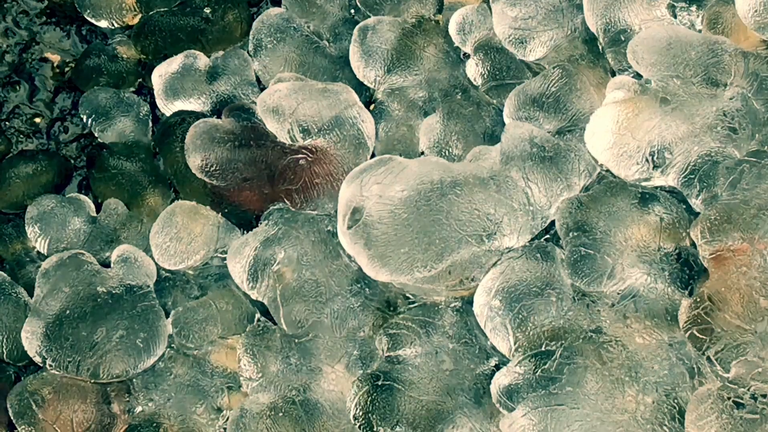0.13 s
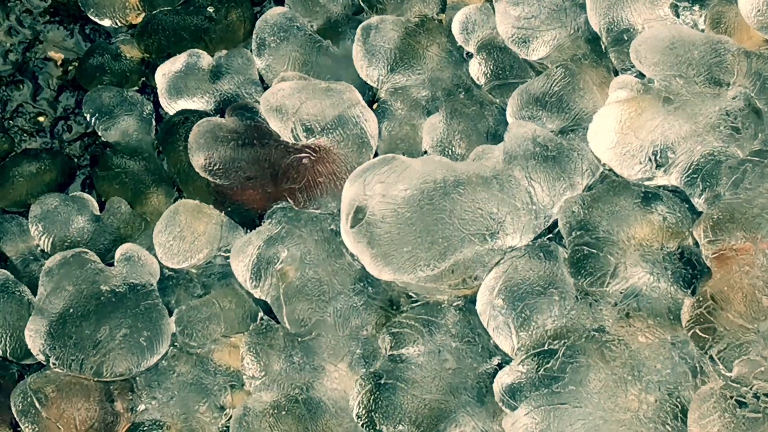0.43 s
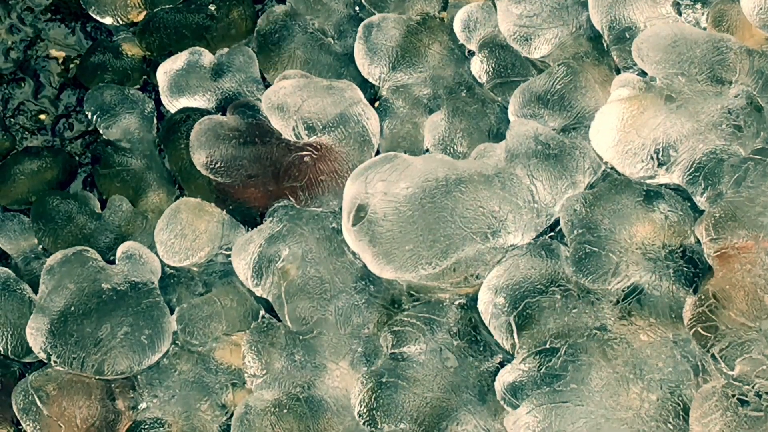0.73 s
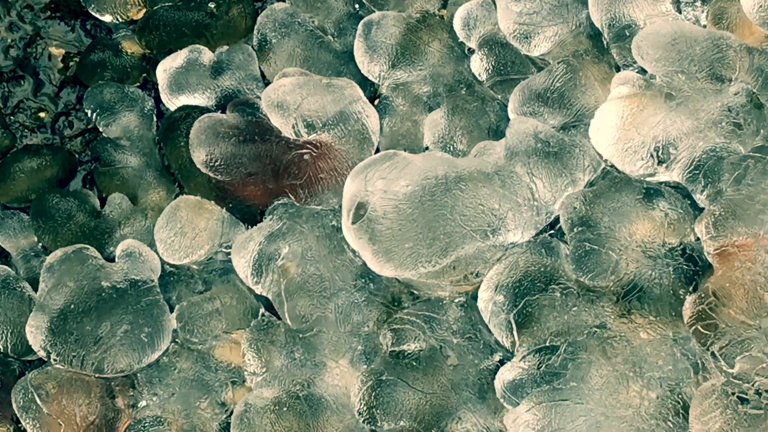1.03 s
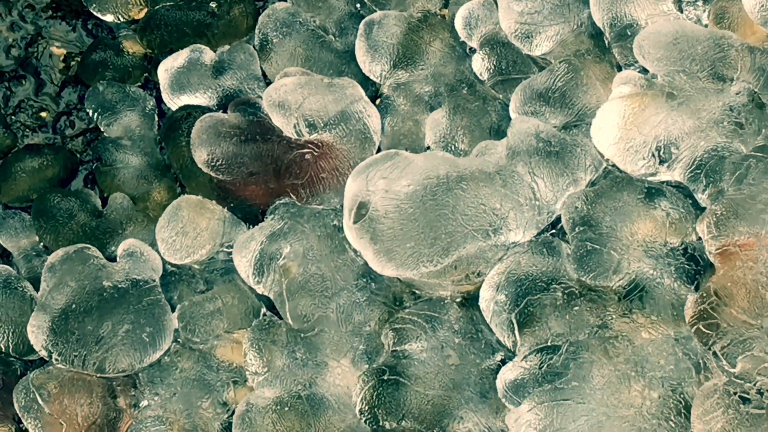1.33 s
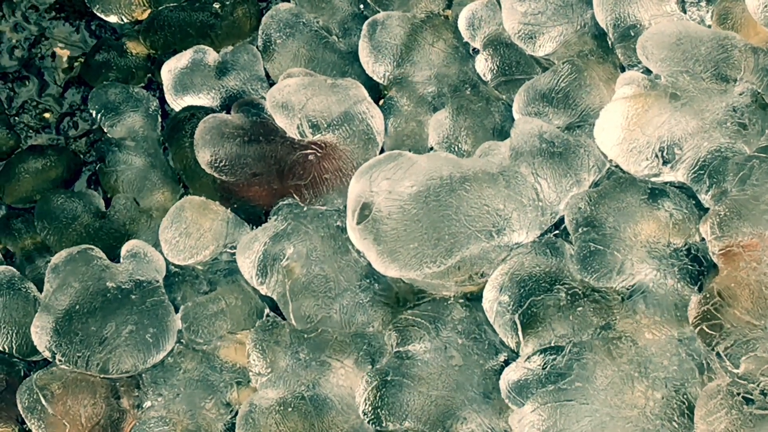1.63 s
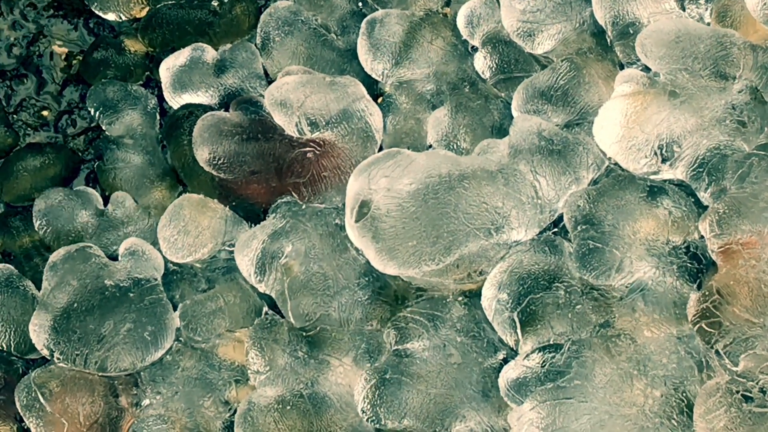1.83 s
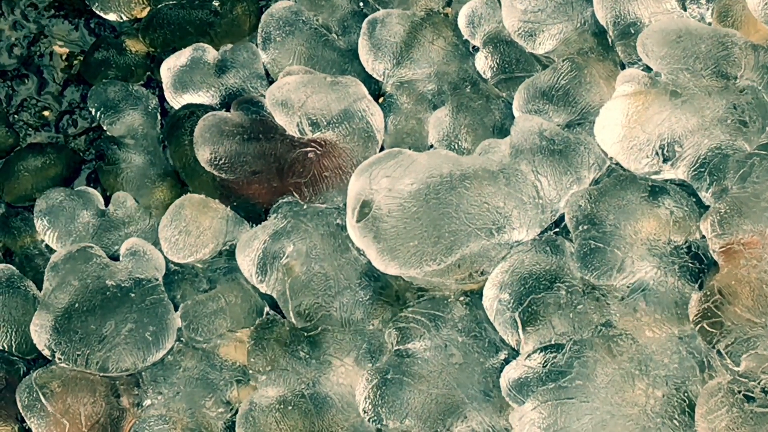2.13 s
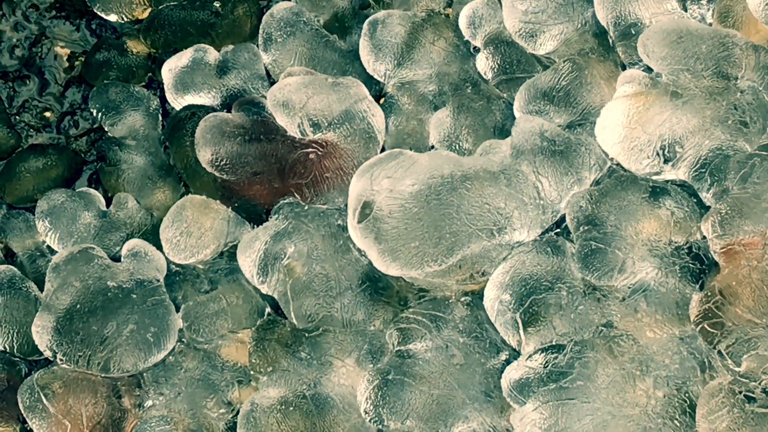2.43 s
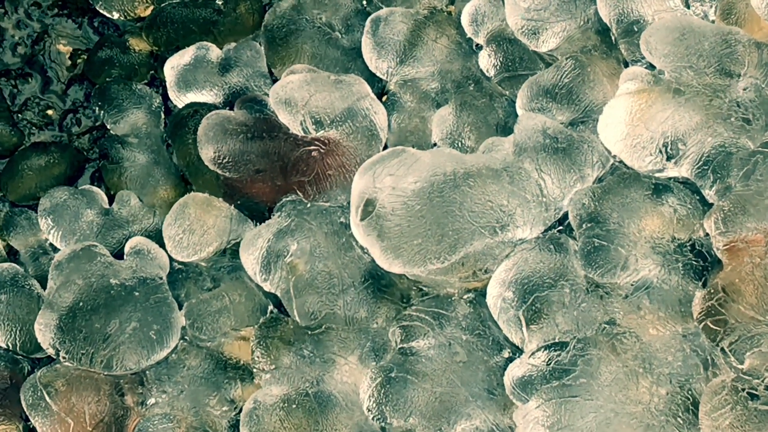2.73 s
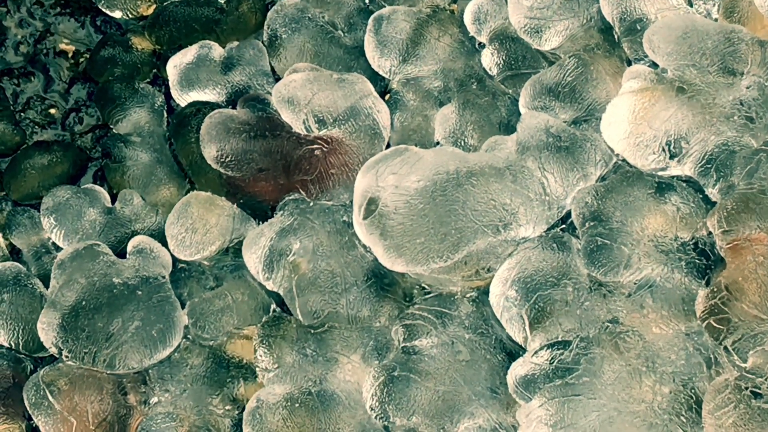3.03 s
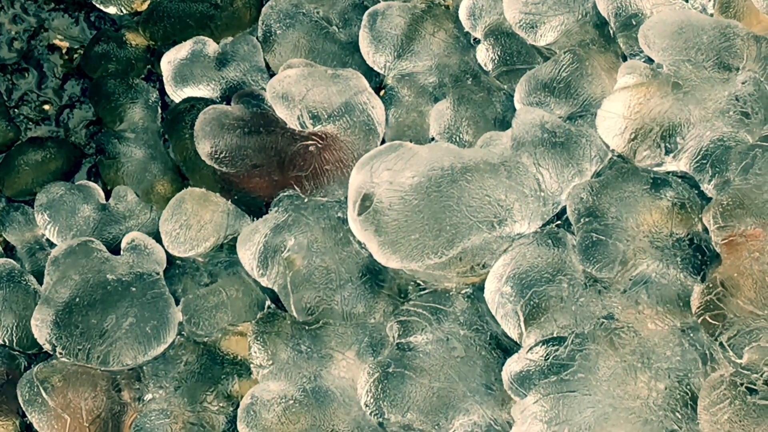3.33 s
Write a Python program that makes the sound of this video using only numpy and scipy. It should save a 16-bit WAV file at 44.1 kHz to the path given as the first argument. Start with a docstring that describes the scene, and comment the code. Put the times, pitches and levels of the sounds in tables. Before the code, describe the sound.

Creek water rushes steadily over stones and ice for about 3.5 seconds, fading in within the first 0.1 second. Dense bright spray, fizzing splashes and small bubbles form an even wash, close and mono. Sharp drops tick irregularly, with brief gurgles among them. Deeper bubbling swells around 1.9-2.9 seconds. Beneath, a soft low rumble continues; a faint engine-like hum emerges near 2, rises wavering, and peaks around 2.9.

```python
"""A creek rushes steadily over stones beside lumps of ice, close to a single microphone.
Filtered noise makes a wash of far water; random clicks set off dense drops, splashes and small bubbles.
A few near drops tick and larger bubbles gurgle, made from short rings and puffs of noise.
Underneath lie a low rumble of filtered noise and a faint hum, a gliding sine like a far engine
gathering speed. The sound fades in at the start."""
import sys
import numpy as np
from scipy import signal
from scipy.fft import rfft, irfft
from scipy.io import wavfile

SR = 44100
rng = np.random.default_rng(int(sys.argv[2]) if len(sys.argv) > 2 else 0)


def persist_wave(psi):
    """Save psi, clipped to +-1, as 16-bit WAV."""
    counts = np.round(np.clip(psi, -1, 1) * 32767).astype(np.int16)
    wavfile.write(sys.argv[1], SR, np.atleast_2d(counts).T)


N = 154350  # samples: 3.5 seconds

# Colour of the water: how strong each pitch range is. Each row: frequency in Hz, relative level in dB per Hz.
WATER_COLOUR = [(30, 0), (130, 1.5), (180, -3.5), (215, -3), (242, 2), (290, -7), (350, 1.5), (435, -6),
                (505, 1), (565, -6), (635, 0), (690, -4), (830, 2), (900, -0.5), (980, 2.5), (1080, -1.1),
                (1600, 0), (2000, -1.96), (2600, 1.3), (3300, 3), (3800, 0), (4550, 3), (4950, -1),
                (5500, 1.5), (6300, 3), (7100, 0), (7650, -2), (8600, 1), (9800, -0.9), (10400, -4),
                (11300, -0.05), (13000, -0.8), (14500, -0.5), (15800, -7)]


def amp(db):
    """Turns decibels into a gain."""
    return 10 ** (np.asarray(db) / 20)


def unit(x):
    """Scales a signal to an rms (average strength) of 1."""
    return x / np.sqrt(np.mean(x ** 2) + 1e-20)


def read_spectrum(points, hz):
    """Reads levels in dB between the points of a spectrum, on a log-frequency axis."""
    point_hz, level_db = np.transpose(points)
    return np.interp(np.log(hz + 1), np.log(point_hz + 1), level_db)


def add(mix, start_s, sound):
    """Mixes a sound in at a time, cutting it off where the mix ends."""
    part = mix[max(round(start_s * SR), 0):][:len(sound)]
    part += sound[:len(part)]


def drift(shape, *lengths):
    """Random field of rms 1, smooth over the given number of steps along each axis."""
    field = rng.standard_normal(shape)
    for axis, length in enumerate(lengths):
        field = np.swapaxes(field, axis, -1)
        n = field.shape[-1]
        smoothing = np.exp(-(2 * np.fft.rfftfreq(n) * length) ** 2)
        field = np.swapaxes(irfft(rfft(field) * smoothing, n), axis, -1)
    return unit(field)


def coloured(x, points, size=4096):
    """Gives a sound a spectrum with a filter that only looks back in time; result has rms 1."""
    level_db = read_spectrum(points, abs(np.fft.fftfreq(size, 1 / SR)))
    log_gain = np.log(amp(level_db))
    # The Hilbert transform finds the phase that puts the filter's energy as early as possible.
    taps = np.fft.ifft(np.exp(np.conj(signal.hilbert(log_gain)))).real
    return unit(signal.oaconvolve(x, taps[:size // 2])[:N])


def impacts(per_s, spread_db, cap):
    """Random clicks, most small and a few large; the largest stand cap * spread_db above the smallest."""
    happens = rng.random(N) < per_s / SR
    size_db = spread_db * np.minimum(rng.exponential(1, N), cap)
    return happens * amp(size_db) * rng.choice([-1, 1], N)


def bubble(hz, cycles):
    """A ringing air pocket that fades in the given number of cycles, its pitch rising as it dies."""
    rise = 0.024  # share of the pitch gained per fade time
    age = np.arange(0, 6, hz / cycles / SR)  # in fade times
    ring = np.sin(2 * np.pi * cycles * age * (1 + rise * age / 2))
    soft_start = 1 - np.exp(-2 * age * cycles)
    return ring * np.exp(-age) * soft_start


def banks(x, size=4096):
    """Adds short scattered echoes from stones and ice: a brief burst of noise-like reflections."""
    echo_db, echo_s = -7, 0.007
    t = np.arange(size) / SR
    echoes = rng.standard_normal(size) * np.exp(-t / echo_s) * (1 - np.exp(-t / echo_s))
    direct = t == 0
    return signal.oaconvolve(x, direct + amp(echo_db) * echoes / np.linalg.norm(echoes))


def wash(size=256):
    """Far water: so many splashes blur into noise, with drifting patches, a shared flicker and a slow swell."""
    wash_db, patch_db, flicker_db, swell_db = -35, 0.82, 0.7, 0.2
    hop = size // 4
    shape, rate = (N // hop + 8, size // 2 + 1), SR / hop  # (time frames, bands), frames per second
    noise = rng.standard_normal(shape) + 1j * rng.standard_normal(shape)
    patches = patch_db * drift(shape, 0.016 * rate, 1300 * size / SR)  # smooth over 16 ms and 1300 Hz
    flicker = flicker_db * drift(shape[0], 0.025 * rate)
    swell = swell_db * drift(shape[0], 0.13 * rate)
    level_db = patches + (flicker + swell)[:, None]
    water = signal.istft((noise * amp(level_db)).T, nperseg=size, noverlap=size - hop)[1][:N]
    return amp(wash_db) * coloured(water, WATER_COLOUR)


def spray(surge, count=24):
    """Fine drops: each impact is a click of about two cycles at most, spread over the treble."""
    spray_db, drops_per_s, spread_db, cap_db = -37.5, 2200, 4.5, 16
    out = np.zeros(N)
    for hz in np.linspace(1200, 15500, count):
        drop = banks(bubble(hz, hz * 0.00015))  # fades in 0.15 ms
        clicks = impacts(drops_per_s / count, spread_db, cap_db / spread_db)
        out += signal.oaconvolve(clicks, drop / np.linalg.norm(drop))[:N]
    return amp(spray_db) * coloured(out * surge, WATER_COLOUR)


def splashes(surge, count=20):
    """Small splashes: breaking water gives sudden puffs of fizzing noise, each in its own band."""
    splash_db, splashes_per_s, spread_db = -40, 290, 1
    fade_s, width_octaves = 0.0052, 0.66
    out, hz = np.zeros(N), np.fft.rfftfreq(N, 1 / SR)
    for centre_hz in np.geomspace(900, 14000, count):
        band = np.exp(-(np.log2((hz + 1) / centre_hz) / width_octaves) ** 2 / 2)
        fizz = irfft(rfft(rng.standard_normal(N)) * band, N)
        hits = impacts(splashes_per_s / count, spread_db, 2.3)
        # Each hit adds power that dies away; the square root turns power into loudness of the fizz.
        power = signal.lfilter([1], [1, -np.exp(-2 / (fade_s * SR))], hits ** 2)
        out += fizz * unit(np.sqrt(power))
    return amp(splash_db) * coloured(out * surge, WATER_COLOUR)


def bubbles(surge, count=48):
    """The babble of many small ringing bubbles of all sizes; the deep ones swell for a while."""
    # Level of the deep bubbles over time. Each row: time in seconds, gain in dB.
    deep_points = [(0, -5), (1.2, -1.5), (1.9, 4.5), (2.9, 5), (3.3, 0)]
    deep_below_hz = 850
    bubble_db, spread_db, ring_cycles = -45, 5, 6
    base_per_s = 600  # shared among the pitches; higher ones come more often, below
    out = np.zeros(N)
    deep_gain = amp(np.interp(np.arange(N) / SR, *np.transpose(deep_points)))
    for hz in np.geomspace(330, 7000, count) * rng.uniform(1.0, 1.03, count):
        ring = banks(bubble(hz, ring_cycles))
        clicks = impacts(base_per_s / count * np.sqrt(hz / 2000), spread_db, 2.2)
        babble = unit(signal.oaconvolve(clicks, ring)[:N])
        out += hz ** 0.32 * babble * (deep_gain if hz < deep_below_hz else 1)
    return amp(bubble_db) * coloured(out * surge, WATER_COLOUR)


def near_drops(size=2000):
    """Near drops: each snaps with a burst of noise, rings briefly and spatters."""
    # The single drops. Each row: start in seconds, energy in dB, pitch in Hz.
    drop_rows = [(.152, -15, 14500), (0.277, -11, 4100), (.3525, -6, 6460), (.387, -16, 3300),
                 (.5515, -3, 14500), (0.5672, -19, 3400), (0.6206, -6, 3200), (.768, -11, 14500),
                 (0.9198, -6, 11000), (1.2793, -9, 3100), (1.3147, -4, 5330), (1.605, -7.5, 8660),
                 (1.682, -8.5, 3000), (1.741, -4, 12700), (1.8161, -8, 2980), (2.053, -10, 5100),
                 (2.498, -7, 9300), (2.7898, -10, 6050), (2.829, -11, 5770), (3.1008, -4.5, 7310),
                 (3.116, -6, 3700), (3.2857, -11, 3910), (3.3518, -9, 12880)]
    ring_cycles, snap, snap_s, spatter, spatter_s = 1.3, 0.3, 0.00064, 0.08, 0.006
    out, t = np.zeros(N), np.arange(size) / SR
    for start_s, db, hz in drop_rows:
        fizz = unit(signal.fftconvolve(rng.standard_normal(size), bubble(hz, 0.42))[:size])
        fade = snap * np.exp(-t / snap_s) + spatter * np.exp(-t / spatter_s)
        soft_start = 1 - np.exp(-t * hz / 2)
        tick = fizz * fade * soft_start
        add(tick, 0, bubble(hz, ring_cycles))
        add(out, start_s, amp(db) * tick / np.linalg.norm(tick))
    return out


def gurgles(size=2000):
    """Larger bubbles: each rings as an air pocket with echoes, in a little splash of noise."""
    # The single bubbles. Each row: start in seconds, level in dB, pitch in Hz.
    gurgle_rows = [(.386, -28, 3350), (0.485, -37, 1640), (0.603, -30, 3090), (.62, -31, 2770),
                   (0.727, -29, 2780), (1.228, -29, 3260), (1.466, -35.5, 1124), (1.673, -39, 2620),
                   (1.814, -37, 3170), (1.85, -36, 615), (2.385, -40, 495), (2.527, -31, 3195),
                   (2.713, -29, 3100), (2.719, -32, 1920), (2.745, -35, 1044), (2.865, -34, 1665),
                   (3.103, -28, 2827), (3.241, -40, 984), (3.364, -33, 2500)]
    ring_cycles, fizz_gain, fizz_s = 7.7, 0.45, 0.015
    out, t = np.zeros(N), np.arange(size) / SR
    for start_s, db, hz in gurgle_rows:
        fizz = unit(signal.fftconvolve(rng.standard_normal(size), bubble(hz, 2.5))[:size])
        add(out, start_s, amp(db) * fizz_gain * fizz * np.exp(-t / fizz_s))
        add(out, start_s, amp(db) * banks(bubble(hz, ring_cycles)))
    return out


def low_rumble():
    """A low rumble: noise kept to the deepest pitches, its level changing slowly."""
    # Colour of the rumble. Each row: frequency in Hz, relative level in dB per Hz.
    rumble_colour = [(15, -55), (28, -33), (42, -5), (52, -5), (64, -2.5), (80, -4), (100, 4), (115, -6),
                     (140, -15.5), (250, -33), (1000, -75)]
    # Its level over time. Each row: time in seconds, level in dB.
    rumble_points = [(0, -44), (.25, -51), (.36, -53.5), (.7, -53), (1.3, -47.5), (1.9, -49), (2.6, -49.5),
                     (3.5, -49.5)]
    gain = amp(read_spectrum(rumble_colour, np.fft.rfftfreq(N, 1 / SR)))
    rumble = unit(irfft(rfft(rng.standard_normal(N)) * gain, N))
    return rumble * amp(np.interp(np.arange(N) / SR, *np.transpose(rumble_points)))


def far_hum():
    """A far hum: one sine tone whose pitch climbs, dips and recovers, its level wavering a little."""
    # Path of the hum. Each row: time in seconds, pitch in Hz, level in dB.
    hum_points = [(1.7, 77.9, -75), (1.95, 79.25, -55), (2.15, 86, -49), (2.35, 88.7, -48),
                  (2.6, 91.5, -45.5), (2.88, 96, -42), (3.15, 91.8, -49), (3.5, 96.4, -51)]
    t = np.arange(N) / SR
    point_s, point_hz, point_db = np.transpose(hum_points)
    turns = np.cumsum(np.interp(t, point_s, point_hz)) / SR
    tone = np.sqrt(2) * np.sin(2 * np.pi * turns)  # rms 1
    waver_db = 0.45 * drift(N, 0.08 * SR)
    return tone * amp(np.interp(t, point_s, point_db) + waver_db)


def scene():
    """Spray, splashes and bubbles surge together over the rest; both channels hear the same."""
    surge_db, surge_s = -0.18, 0.015
    surge = amp(surge_db * drift(N, surge_s * SR))
    creek = wash() + spray(surge) + splashes(surge) + bubbles(surge)
    creek += near_drops() + gurgles()
    creek += low_rumble() + far_hum()
    return np.array([creek, creek])


def record(dry):
    """A quick fade-in, then a steep filter that removes the highest treble."""
    edge_hz = 15800
    faded = dry * np.interp(np.arange(N) / SR, [0.036, 0.1], [0, 1])  # fade times in seconds
    low_pass = signal.firwin(601, edge_hz, window=("kaiser", 8), fs=SR)
    return signal.oaconvolve(faded, low_pass[None], "same")


dry = scene()
out = record(dry)
persist_wave(out)
```